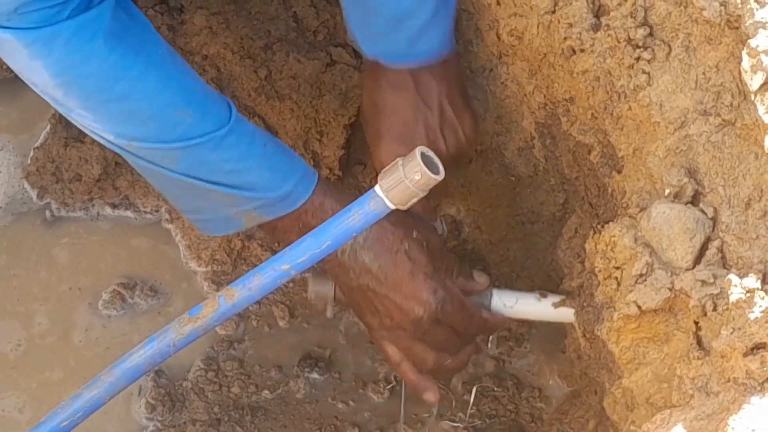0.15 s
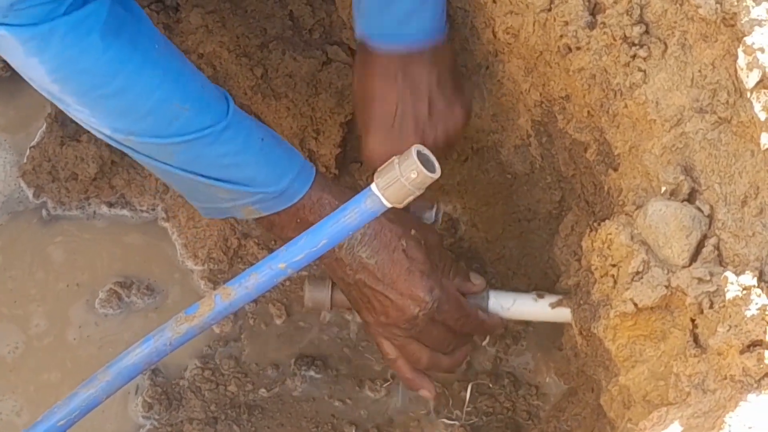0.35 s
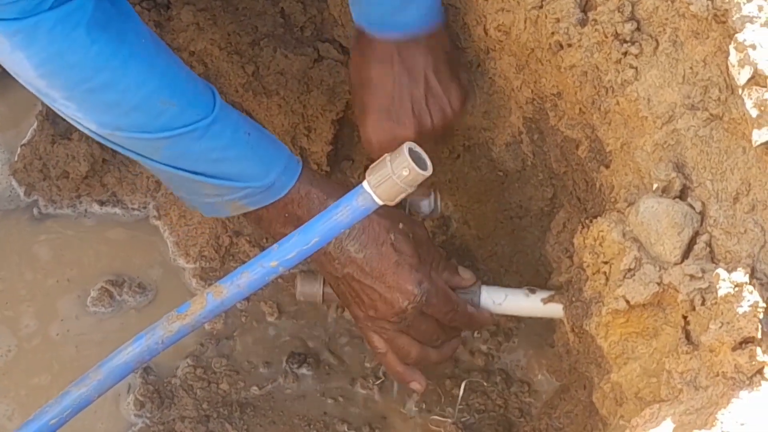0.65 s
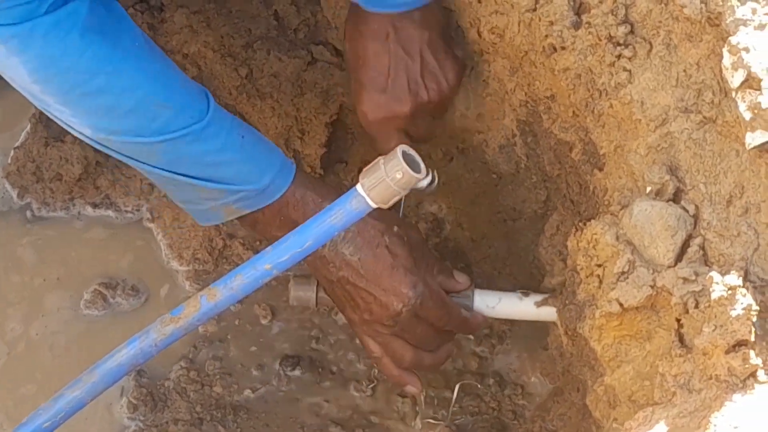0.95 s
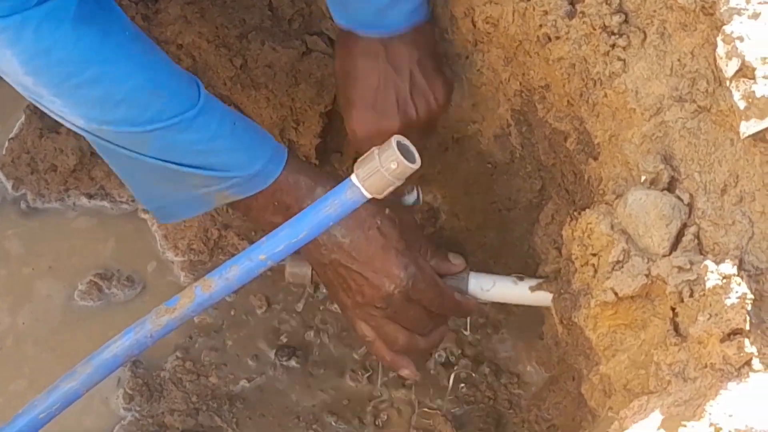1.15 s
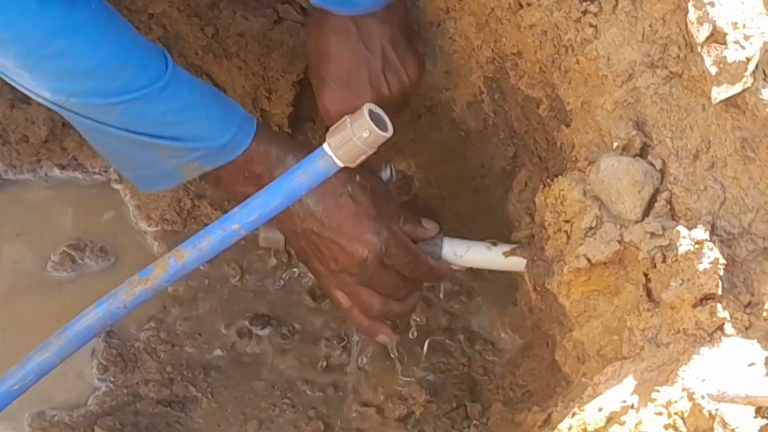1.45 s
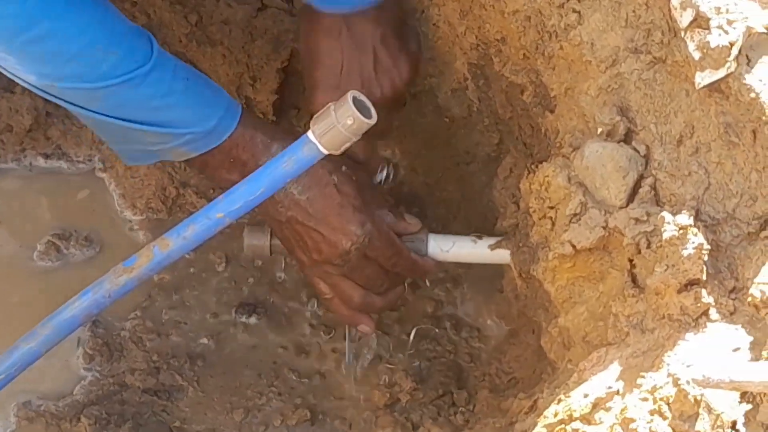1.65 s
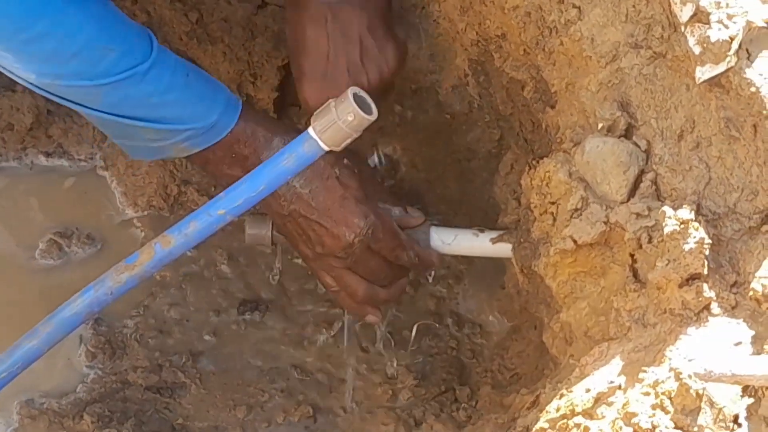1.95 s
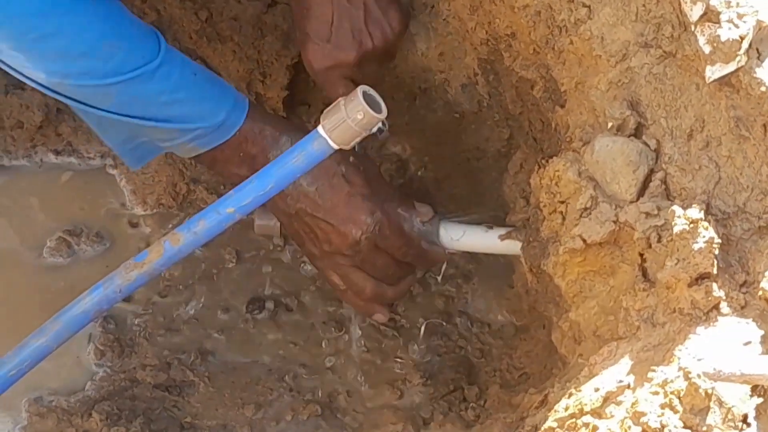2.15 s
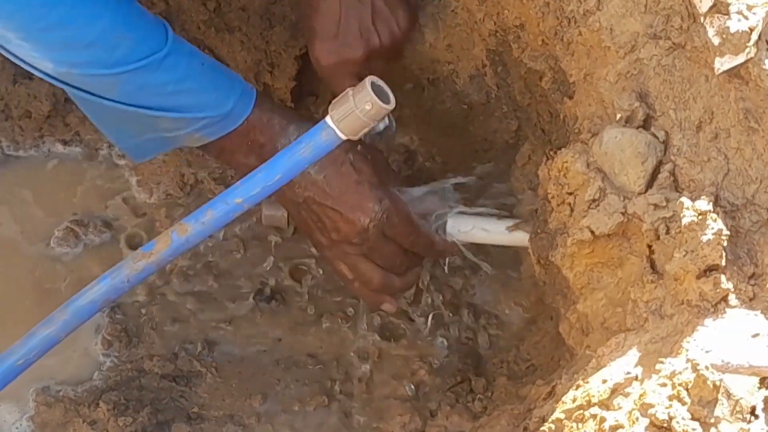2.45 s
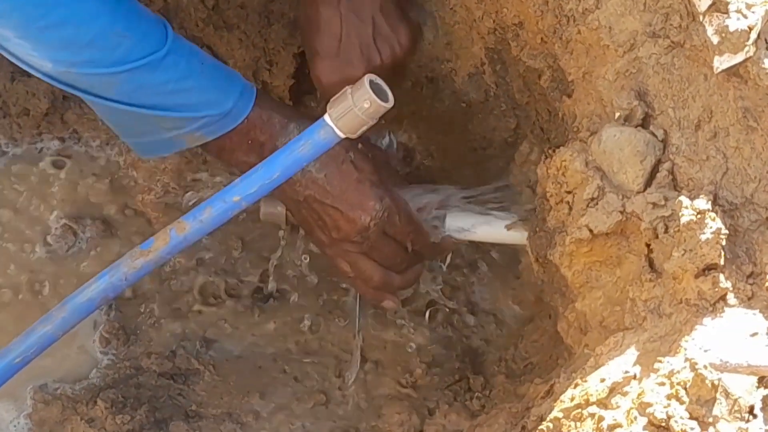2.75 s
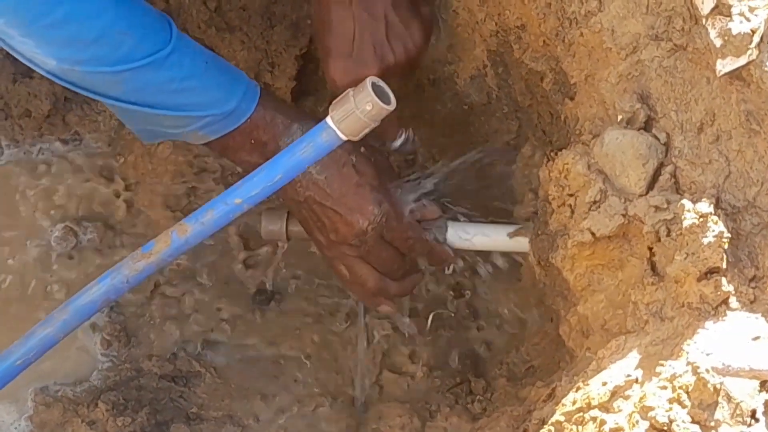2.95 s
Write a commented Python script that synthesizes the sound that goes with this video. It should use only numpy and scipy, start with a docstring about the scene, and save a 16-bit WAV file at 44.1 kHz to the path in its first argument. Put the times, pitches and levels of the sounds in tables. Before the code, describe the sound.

Close, quick sawing on a hollow plastic pipe, harsh pushes alternating with softer upward-zipping pulls; wind thumps the microphone early, mostly on the left, then water hisses and spatters from the cut in a muddy outdoor hole.

```python
"""Fast to-and-fro sawing comes first: a blade across a plastic water pipe in a muddy hole, close to the microphone.
Tooth clicks and scrape noise ring the pipe: they rasp on the push and zip upward in pitch on most pulls.
Wind, filtered noise and slaps, buffets mainly the left microphone port during the first half.
As the cut opens, water hisses out and spatters the mud: filtered noise strewn with droplet clicks."""
import sys
import numpy as np
from scipy import signal
from scipy.fft import rfft, irfft
from scipy.io import wavfile
from scipy.ndimage import uniform_filter1d

SR = 44100
rng = np.random.default_rng(int(sys.argv[2]) if len(sys.argv) > 2 else 0)


def to_wav(sig):
    """Store sig (one row per channel, or 1-D mono) as 16-bit WAV at the path in sys.argv[1].

    Samples outside -1..1 are clipped; the rate is SR.
    """
    pcm = np.clip(np.atleast_2d(sig), -1, 1) * 32767
    pcm = np.round(pcm).astype(np.int16)
    wavfile.write(sys.argv[1], SR, pcm.T)  # frames by channels


N = 136710

# Strokes of the blade toward the pipe: start_s, length_s, lean_db (level change over the stroke),
# then relative low_db, body_db, rasp_db, treble_db, and edge_s (rise and fall)
PUSH_STROKES = [(0, 0.067, -5.5, -45.5, -41, -47, -38, 0.0023),
                (0.171, 0.068, 0.5, -48, -38, -43.5, -40, 0.0067),
                (0.51, 0.07, -7, -34, -32, -33, -34.5, 0.0018),
                (.838, 0.07, -9.5, -37, -30, -34, -33, 0.0082),
                (1.144, 0.086, -1.5, -39, -37.5, -34, -37, 0.0037),
                (1.46, 0.078, -2, -37, -31.5, -36.5, -35, 0.005),
                (1.785, .082, -1.5, -39.5, -36, -45, -45, 0.0044),
                (2.113, 0.058, -5.5, -37, -37.5, -46, -42.5, 0.016),
                (2.44, 0.067, -4, -38, -40, -47.5, -49, 0.0097),
                (2.746, 0.067, 0.5, -36, -43.5, -54, -61, 0.012)]
# Strokes of the blade back: start_s, length_s, lean_db, then relative low_db, body_db, rasp_db, treble_db
PULL_STROKES = [(0.322, 0.067, 5, -47.5, -38, -48.5, -49), (0.639, 0.061, 0, -42, -35, -44.5, -44),
                (0.964, 0.071, 1, -46, -38, -41.5, -43.5), (1.284, 0.062, 2.5, -51, -38.5, -45, -44),
                (1.615, 0.061, 0, -44.5, -42.5, -47.5, -46.5), (1.92, 0.056, -4.5, -50, -32, -51, -48),
                (2.254, 0.061, -6.5, -50.5, -41.5, -50, -46), (2.581, 0.052, 1.5, -44.5, -41.5, -56, -44.5),
                (2.933, 0.052, 0.5, -51, -62, -68, -60)]
# Skipping teeth on the pull: loudest_s, half_length_s, pitch_hz at the loudest moment, rise_hz_per_s, relative level_db
TOOTH_ZIPS = [(.356, .026, 620, 4624, -31), (.668, .018, 566.8, 1993, -29.5),
              (1.007, .02, 638.3, 5244, -28.5), (1.311, .016, 652.8, 7460, -22.5),
              (1.623, 0.0081, 587.3, 1003, -36), (1.942, .02, 639, 3810, -26.5)]
# Colour of the pipe on the push, at each port: freq_hz, gain_db
PUSH_COLOUR_LEFT = [(250, -3.5), (550, 1), (780, -10.5), (1050, 5.5), (1400, -11), (1750, -15), (2350, 1),
                    (3400, -18), (5400, -17), (8500, -28), (15500, -27)]
PUSH_COLOUR_RIGHT = [(250, 5.5), (550, 2), (900, -1), (1150, 2), (1650, -14), (2400, 9), (2900, 3.5),
                     (4000, -12), (5500, -21), (7000, -23), (8500, -16.5), (12000, -28.5), (15500, -26.5)]
PULL_EDGE_S = 0.0067


def undb(db):
    """Decibels to gain."""
    return 10 ** (np.asarray(db) / 20)


def unit(x):
    """Scale to rms 1."""
    return x / np.sqrt(np.mean(x ** 2) + 1e-18)


def curve(table, axis):
    """One column of a table over time."""
    rows = np.array(table)
    return np.interp(np.arange(N) / SR, rows[:, 0], rows[:, axis])


def over_bins(points, size):
    """(Hz, value) points spread over the bins of a transform, along log frequency."""
    rows = np.array(points)
    bin_hz = np.arange(size // 2 + 1) * SR / size
    return np.interp(np.log(bin_hz + 1), np.log(rows[:, 0]), rows[:, 1])


def colour(x, points, size=4096):
    """Causal, minimum-phase filter with the given (Hz, dB) shape."""
    cepstrum = irfft(np.log(undb(over_bins(points, size))))
    # fold the cepstrum forward in time
    cepstrum[1:size // 2] *= 2
    cepstrum[size // 2 + 1:] = 0
    response = irfft(np.exp(rfft(cepstrum)))
    return signal.fftconvolve(np.atleast_2d(x), response[None], axes=1)[:, :N]


def walk(rate):
    """Smooth random wander with a spread near 1, through `rate` knots per second."""
    knots = rng.standard_normal(N // 16)
    return np.interp(np.arange(N) / SR * rate, np.arange(len(knots)), knots) * np.sqrt(3 / 2)


def uneven(scatter_db):
    """Random gains, held within two spreads."""
    return undb(scatter_db * np.clip(rng.standard_normal(N), -2, 2))


def grains(per_s, scatter_db):
    """Random clicks of uneven size and either sign, at rms 1."""
    hits = rng.random(N) < per_s / SR
    return unit(hits * rng.choice([-1, 1], N) * uneven(scatter_db))


def burst(start, decay_s, rise_s):
    """A quick rise and an exponential fall."""
    age = np.maximum(np.arange(N) / SR - start, 0)
    return np.minimum(age / rise_s, 1) * np.exp(-np.maximum(age - rise_s, 0) / decay_s)


def blade_speed(table):
    """The blade speeds up and slows within each stroke; 1 at its fastest."""
    t = np.arange(N) / SR
    end_speed = .55
    swing = sum(np.sin(np.pi * np.clip((t - start) / length, 0, 1)) for start, length, *_ in table)
    return end_speed + (1 - end_speed) * swing


def teeth(hz):
    """One uneven click for each tooth that crosses the cut."""
    tooth_jitter, tooth_scatter_db = .07, 3.2
    phase = np.cumsum(hz * np.maximum(1 + tooth_jitter * walk(600), .1) / SR)
    clicks = np.diff(np.floor(phase), prepend=0) * uneven(tooth_scatter_db)
    return unit(clicks - uniform_filter1d(clicks, size=256))  # without the slow drift


def pipe_ring(x):
    """The pipe's modes die away exponentially, each with unit gain at its centre before its own level."""
    # Pipe modes that ring on: freq_hz, t60_s, level_db
    modes = [(366.5, 0.12, 8.5), (462.7, 0.17, 8), (579, 0.045, 9.5), (831, 0.17, -20), (1097, 0.13, 3.5),
             (1361, 0.076, 6), (1908, 0.1, 6.5), (2327, 0.054, 5), (2903, 0.091, 5.5)]
    t = np.arange(SR // 2) / SR
    ring = 0
    for hz, t60, db in modes:
        centre_gain = 2 * np.log(1000) / (t60 * SR)
        ring = ring + undb(db) * centre_gain * undb(-60 * t / t60) * np.cos(2 * np.pi * hz * t)
    return signal.fftconvolve(x, ring[None], axes=1)[:, :N]


def blade_echo(x):
    """Each click runs along the blade and back; as its free length changes, the resonances shift."""
    echo_s, drift, share = .0024, .07, .5
    n = np.arange(N)
    ports = []
    for port in x:
        delay = echo_s * SR * (1 + drift * walk(10))
        ports.append(port + share * np.interp(n - delay, n, port, left=0))
    return np.array(ports)


def pipe(force, left, right):
    """A force rings the pipe; heard at two ports, the left one later, in four bands of rms 1."""
    # Power share common to both ports: freq_hz, share
    likeness = [(200, 0.57), (1200, 0.89), (2500, 0.9), (4500, 0.15), (8000, 0.58), (15000, 0.039)]
    # Edges between low, body, rasp and treble: freq_hz
    edges_hz = [200, 700, 1700, 5000, 16500]
    port_lag_s = .00006
    alike = np.clip(over_bins(likeness, N), 0, 1)
    own = np.array([grains(5000, 6.1), grains(5000, 2.1)])
    lag = np.exp(-2j * np.pi * np.outer([port_lag_s, 0], np.arange(N // 2 + 1) * SR / N))
    x = irfft(rfft(force) * lag * np.sqrt(alike) + rfft(own) * np.sqrt(1 - alike), N)
    x = blade_echo(x + pipe_ring(x))
    x = np.vstack([colour(x[0], left), colour(x[1], right)])
    bands = []
    for edges in zip(edges_hz, edges_hz[1:]):
        band_pass = signal.butter(4, edges, "band", fs=SR, output="sos")
        bands.append(unit(signal.sosfilt(band_pass, x)))
    return bands


def strokes(table, edges_s, tooth_hz, scrape_db, left, right):
    """Teeth click, scrape and chatter on the pipe, louder as the blade runs faster."""
    chatter_db, chatter_per_s = 2.2, 250
    t, levels = np.arange(N) / SR, 0
    for (start, length, lean_db, *band_db), edge in zip(table, edges_s):
        along = np.clip((t - start) / length, 0, 1)
        before = np.maximum(2 * (start - t) + edge, 0)
        after = np.maximum(t - start - length, 0)
        shape = np.exp(-before / edge - after / edge)
        levels = levels + undb(band_db)[:, None] * shape * undb(lean_db * along)
    # scrape_db is relative to the tooth clicks
    force = unit(teeth(tooth_hz) + undb(scrape_db) * rng.standard_normal(N))
    chatter = unit(undb(chatter_db * walk(chatter_per_s)))
    rasp = sum(g * band for g, band in zip(levels, pipe(force, left, right)))
    return rasp * chatter * (0.72 + 0.58 * blade_speed(table))


def bite():
    """Gain of the blade's grip on the pipe, dipping where it briefly loses its bite."""
    # Lost bite: middle_s, dip_db
    slips = [(0.553, -12), (1.208, -6.5), (1.51, -10.5), (1.823, -3.5)]
    slip_s = 0.006
    t = np.arange(N) / SR
    return undb(sum(db * np.exp(-((t - when) / slip_s) ** 2) for when, db in slips))


def push_strokes():
    """The teeth rasp across the pipe at a rate that follows the blade's speed."""
    tooth_hz = 1109 * blade_speed(PUSH_STROKES)
    table, edges_s = [row[:-1] for row in PUSH_STROKES], [row[-1] for row in PUSH_STROKES]
    return bite() * strokes(table, edges_s, tooth_hz, 7, PUSH_COLOUR_LEFT, PUSH_COLOUR_RIGHT)


def hole(x):
    """A short decaying noise tail from the earth walls and the yard, strong near 700 Hz and at the very top."""
    t60_s, tail_db = 0.19, -13.5
    t = np.arange(N) / SR
    decay = rng.standard_normal((2, N)) * undb(-60 * t / t60_s) * (t > .006)  # starts 6 ms late
    tail = colour(decay, [(200, -7), (700, 10), (1400, -4.5), (2500, -29.0), (8000, -72), (15000, 9)])
    wet = signal.fftconvolve(x, tail, axes=1)[:, :N]
    return undb(tail_db) * wet / np.sqrt(t60_s * SR / (2 * np.log(1000)))


def water(shape, likeness, droplets_per_s):
    """Flickering spray, noise with droplet clicks in it, partly shared by the ports."""
    flicker_db, droplet_scatter_db, droplet_db = 1., 5, -2.5
    shared, left, right = (
        rng.standard_normal(N) + undb(droplet_db) * grains(droplets_per_s, droplet_scatter_db)
        for _ in range(3))
    alike = np.clip(likeness, 0, 1)
    x = np.sqrt(alike) * shared + np.sqrt(1 - alike) * np.array([left, right])
    return unit(colour(x, shape) * undb(flicker_db * walk(60)))


def leak():
    """The jet hisses, spatters on the hand and splashes into the mud."""
    # The leak over time, relative levels: time_s, hiss_db, spatter_db, splash_db
    flow = [(0, -54.5, -60.5, -59.5), (.9, -54.5, -59, -50.5), (1.3, -52.5, -53.5, -73),
            (1.6, -51.5, -54.5, -85), (1.76, -52.5, -61.5, -61.5), (1.9, -45, -52.5, -53),
            (2.07, -47, -51.5, -61.5), (2.21, -42.5, -50.5, -63), (2.37, -37.5, -44, -52),
            (2.53, -42, -46, -56.5), (2.67, -38, -44.5, -51.5), (2.77, -35.5, -40.5, -56),
            (2.85, -37, -43, -49), (3.02, -35.5, -47.5, -53.5), (3.1, -32.5, -37, -50.5)]
    # Colour of each layer: freq_hz, gain_db
    hiss_colour = [(2500, -6), (4200, 0.5), (5600, 6), (7200, 1), (8300, 0.5), (12500, 1.5), (15500, 3.5)]
    spatter_colour = [(900, -42), (1500, -5.5), (1900, 3), (2350, 4.5), (3100, -0.5), (4200, 0.5),
                      (6000, -22.5), (10000, -40)]
    splash_colour = [(100, -9), (220, -10.5), (360, 1.5), (580, 1.5), (800, -6), (1100, -7), (1400, -11),
                     (2200, -28), (5000, -53)]
    # each with its left-minus-right pan in dB
    layers = [
        (water(hiss_colour, 0.005, droplets_per_s=1800), -1.5),
        (water(spatter_colour, 0.16, droplets_per_s=400), -2.5),
        (water(splash_colour, 0.61, droplets_per_s=90), -2)]
    total = 0
    for k, (x, pan_db) in enumerate(layers):
        pan = undb(np.array([[pan_db], [-pan_db]]) / 2)
        total = total + x * undb(curve(flow, axis=k + 1)) * pan
    return total


def wind():
    """Rumble on each port, with sharper buffets when the gust is strong."""
    # Rumble on the ports: time_s, left_db, right_db
    gusts = [(0, -52.5, -49.5), (.31, -53, -53.5), (.39, -31.5, -64), (.52, -28, -55), (.65, -26, -53),
             (.73, -24.5, -52), (.86, -19.5, -34), (1.0, -20, -55), (1.17, -20, -38), (1.32, -24, -49),
             (1.4, -20.5, -30.5), (1.5, -17, -43), (1.57, -30.5, -34), (1.65, -49, -43.5), (1.69, -32, -27),
             (1.74, -102, -69), (1.87, -50, -38), (1.93, -86, -52.5), (2.02, -88, -47.5), (2.32, -78, -67),
             (2.39, -42, -41.5), (2.55, -74, -60), (3.1, -73, -55.5)]
    # Colours of the two kinds of noise: freq_hz, gain_db
    rumble_colour = [(20, -27), (35, -37.5), (50, -2.5), (65, -3), (90, -4.5), (125, -6.5), (170, -13.5),
                     (250, -21.5), (400, -34.5), (700, -37.5), (1400, -100)]
    buffet_colour = [(30, -12), (80, 2.5), (160, 8), (300, 4.5), (500, -13), (800, -31), (1500, -57),
                     (4000, -65)]
    buffets_per_s = 90
    # buffets stand at buffet_db against the rumble when the gust is at full_db
    buffet_db, full_db, growth_db_per_db = -4, -17.5, 1
    ports = []
    for k in range(2):
        db = curve(gusts, axis=k + 1)
        rumble = unit(colour(rng.standard_normal(N), rumble_colour)[0])
        buffets = unit(colour(grains(buffets_per_s, 3.1), buffet_colour)[0])
        buffet_gain = undb(buffet_db + growth_db_per_db * (db - full_db))
        ports.append(undb(db) * (rumble + buffets * buffet_gain))
    return np.array(ports)


def catches():
    """Short crunches where the teeth snag and let go, and soft rubs where the blade turns into a push."""
    # The blade catches in the cut, relative levels: start_s, body_db, rasp_db, treble_db
    snags = [(0.095, -49.5, -44, -40), (0.23, -27, -36, -38.5), (0.321, -27, -44, -47),
             (0.407, -44, -38, -38.5), (0.491, -29, -45, -47), (.513, -21.5, -38, -30.5),
             (0.565, -27, -37, -35), (.718, -46, -40, -33.5), (.814, -24.5, -31, -33),
             (0.844, -21, -30.5, -27), (1.464, -46, -26.5, -37), (1.615, -34.5, -60, -53),
             (1.92, -28.5, -47, -48), (2.561, -39, -32, -33.5)]
    # The blade rubs softly as it turns: start_s, relative level_db
    turns = [(1.772, -46), (2.091, -39), (2.417, -42.5)]
    snag_decay_s, rub_decay_s = 0.0089, 0.019
    low, *bands = pipe(grains(4400, 1.1), PUSH_COLOUR_LEFT, PUSH_COLOUR_RIGHT)
    levels = sum(undb(band_db)[:, None] * burst(start, snag_decay_s, 0.0007) for start, *band_db in snags)
    crunches = sum(g * band for g, band in zip(levels, bands))
    rub_level = sum(undb(db) * burst(start, rub_decay_s, 0.0028) for start, db in turns)
    return crunches + rub_level * (low + bands[0]) / np.sqrt(2)


def zip_pitch():
    """Rate at which the teeth skip on the pull: it climbs around each listed zip and otherwise holds steady."""
    t, hz = np.arange(N) / SR, np.full(N, float(TOOTH_ZIPS[0][2]))
    for middle, half, pitch, rise, _ in TOOTH_ZIPS:
        hz = np.where(np.abs(t - middle) < 2 * half, pitch + rise * (t - middle), hz)
    return hz


def pull_strokes():
    """The teeth click at the skip rate, climbing where a zip is listed, with less scrape than on the push."""
    # Colour of the pipe on the pull, at each port: freq_hz, gain_db
    left_colour = [(250, -17.5), (450, -10), (600, -4.5), (900, -6), (1370, -7.5), (1570, -21.5),
                   (1900, -16.5), (2350, -7.5), (3500, -25), (5500, -13.5), (8500, -25), (15500, -23)]
    right_colour = [(250, -17), (450, 0), (600, -6), (900, 3.5), (1370, -6.5), (1570, -12), (1900, -9),
                    (2400, -8), (3500, -2.5), (4500, -19.5), (7000, -18.5), (8500, -15.5), (12000, -19),
                    (15500, -32)]
    edges_s = [PULL_EDGE_S] * len(PULL_STROKES)
    return strokes(PULL_STROKES, edges_s, zip_pitch(), -0.5, left_colour, right_colour)


def zips():
    """On most pulls the teeth skip over the cut and sound a rough, rising tone that swells and fades."""
    # Harmonics of the skip rate, from the first: level_db
    harmonics_db = [3.5, 6, -26, -28]
    jitter, flutter_db = .052, 3.5
    t = np.arange(N) / SR
    pulling = sum(np.clip((t - start) / PULL_EDGE_S, 0, 1) * (t < start + 2 * length)
                  for start, length, *_ in PULL_STROKES)
    swell = 0
    for middle, half, *_, db in TOOTH_ZIPS:
        off = (t - middle) / half
        swell = swell + undb(db) * np.exp(-off ** 2 / 2 - (off / 2) ** 4)
    phase = 2 * np.pi * np.cumsum(zip_pitch() * (1 + jitter * walk(400))) / SR
    tone = sum(undb(db + flutter_db * walk(250)) * np.sin((k + 1) * phase)
               for k, db in enumerate(harmonics_db))
    tone = unit(colour(tone, [(450, -5.5), (600, -0.5), (1380, -2.5), (1560, -21.5), (2300, 5.5)]))
    return pulling * swell * tone * undb(np.array([[-2.5], [1.5]]))  # stronger on the right


def drops():
    """Bright smacks of single drops: short bursts of coloured noise."""
    # Single drops: start_s, relative level_db
    smacks = [(0.625, -31.5), (0.786, -33), (2.332, -33), (2.421, -33), (2.510, -32), (2.562, -30),
              (2.613, -31), (2.693, -37), (2.811, -32.5)]
    # Colour of a smack: freq_hz, gain_db
    smack_colour = [(2500, -12), (5500, -5), (8500, 5), (12000, 6), (15500, 1.5)]
    decay_s = 0.0061
    level = sum(undb(db) * burst(start, decay_s, 0.0011) for start, db in smacks)
    return level * unit(colour(rng.standard_normal((2, N)), smack_colour))


def knocks():
    """Single eddies slap the left port: small ones knock sharply, big ones thump."""
    # Eddies: start_s, level_db (peak of the envelope), pitch_hz
    eddies = [(.711, -12.5, 86), (.776, -15, 137), (.857, -13.5, 328), (0.895, -11.5, 99.4),
              (.974, -8, 187), (0.998, -12, 101), (1.065, -17, 290), (1.162, -11.5, 414),
              (1.171, -11.5, 90), (1.209, -9.5, 212), (1.248, -14.5, 320), (1.278, -13, 510),
              (1.281, -10, 200), (1.303, -12.5, 365), (1.368, -9.5, 220), (1.426, -15, 219.4),
              (1.471, -9.5, 121)]
    peak_cycles = 0.4  # the envelope peaks this far into the tone
    left = 0
    for start, db, hz in eddies:
        cycles = np.maximum(np.arange(N) / SR - start, 0) * hz
        envelope = cycles / peak_cycles * np.exp(1 - cycles / peak_cycles)
        left = left + undb(db) * envelope * np.sin(2 * np.pi * cycles)
    return np.array([left, np.zeros(N)])


def scene():
    """Sawing and drops with their tail in the hole, the leak, and wind on the ports."""
    ring_on_db = -21.5
    saw = push_strokes() + pull_strokes() + zips() + catches()
    near = saw + undb(ring_on_db) * pipe_ring(saw) + drops()
    return (near + hole(near) + leak()) * undb(-1.44) + wind() + knocks()


def record(dry):
    """The recorder cuts the top with a steep low-pass filter."""
    top_hz = 15700
    return signal.sosfilt(signal.ellip(10, .2, 80, top_hz, fs=SR, output="sos"), dry)


dry = scene()
out = record(dry)
to_wav(out)
```